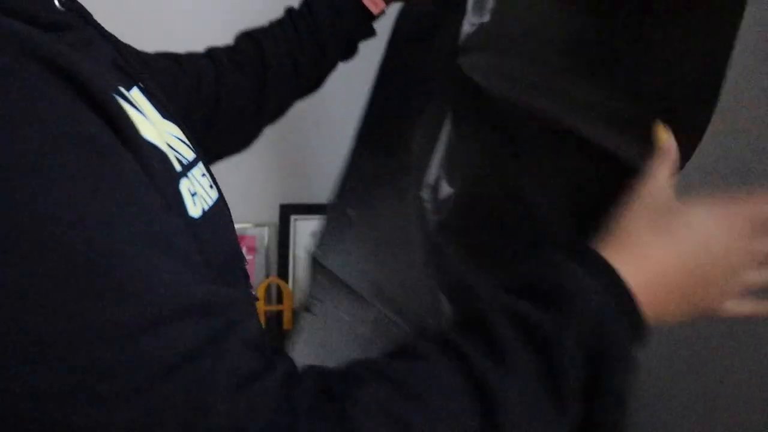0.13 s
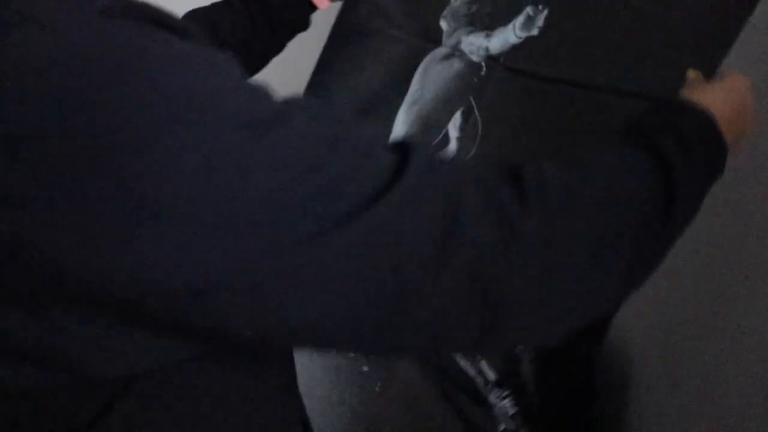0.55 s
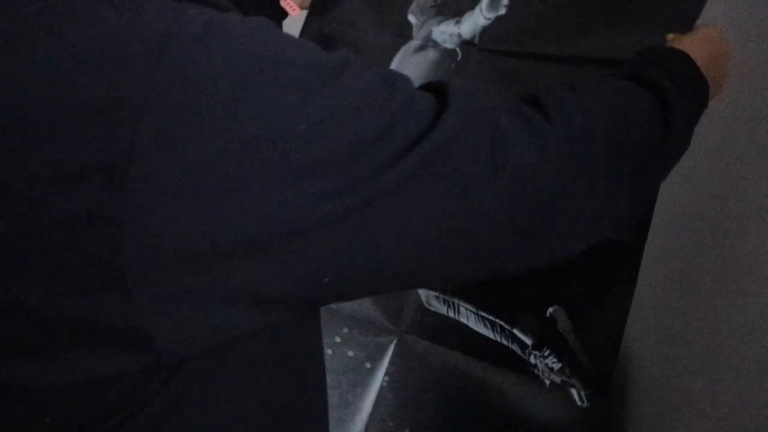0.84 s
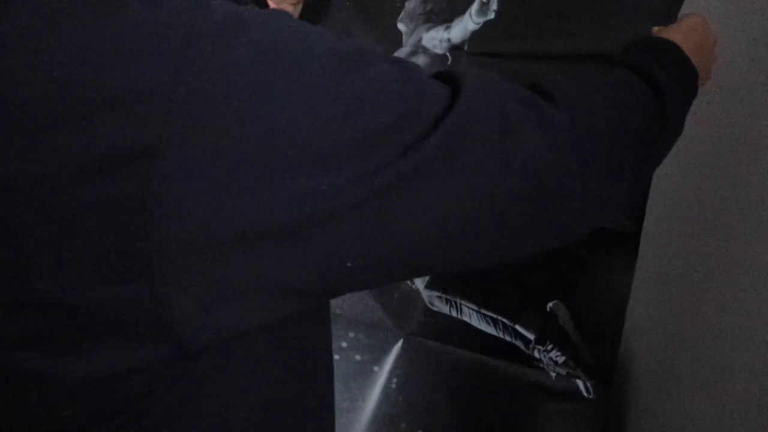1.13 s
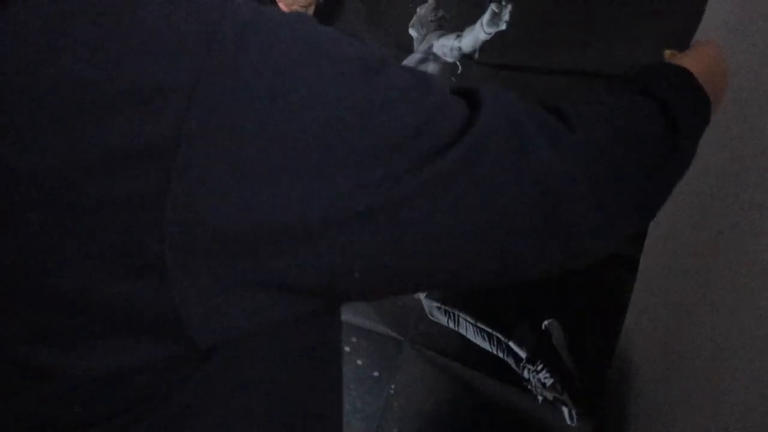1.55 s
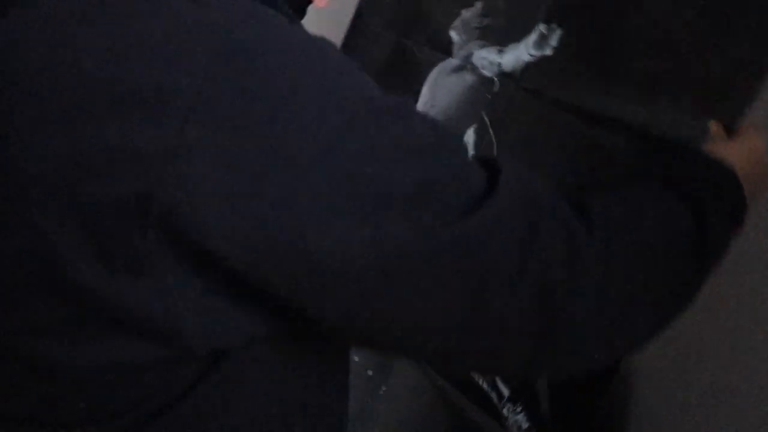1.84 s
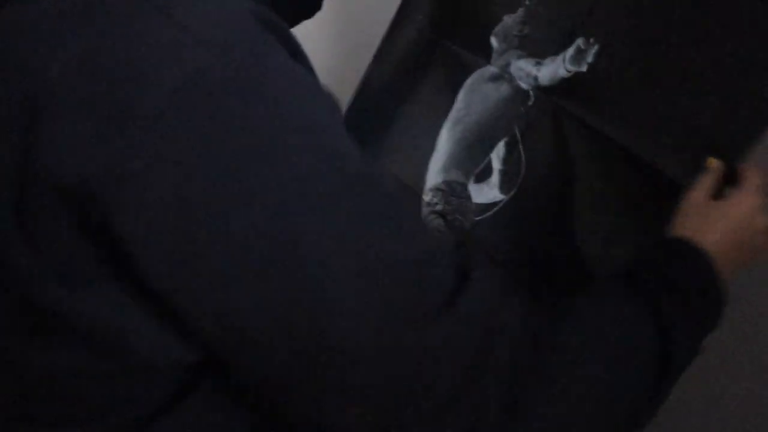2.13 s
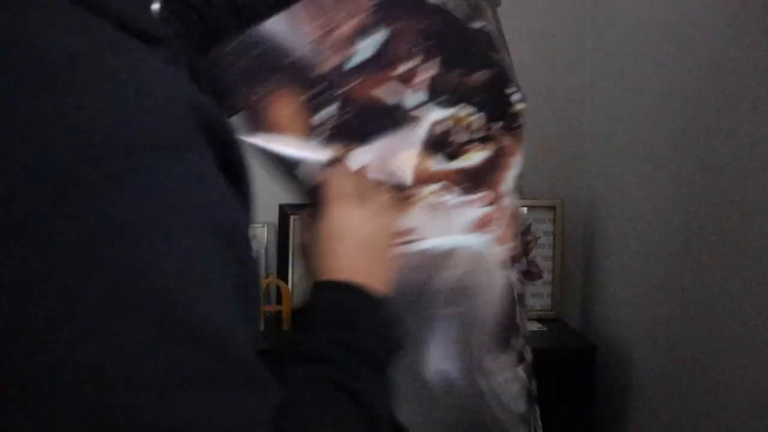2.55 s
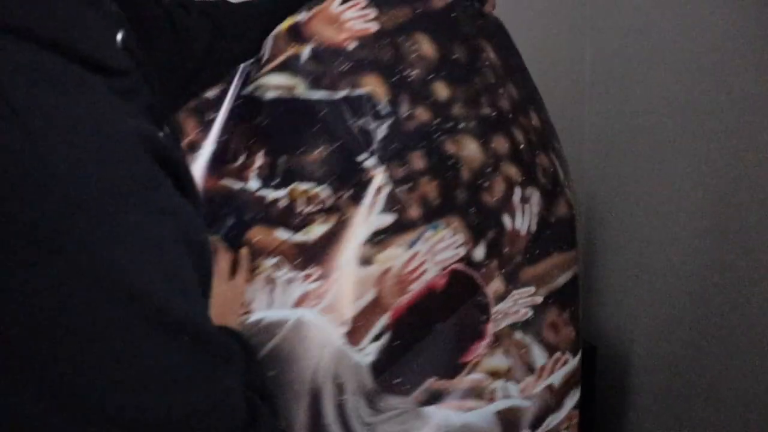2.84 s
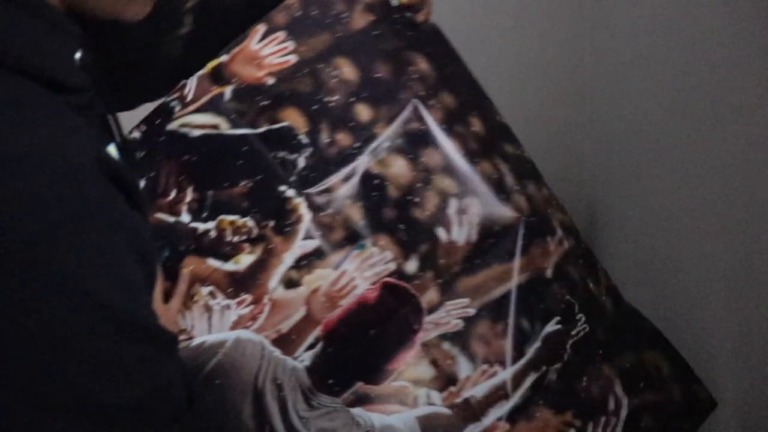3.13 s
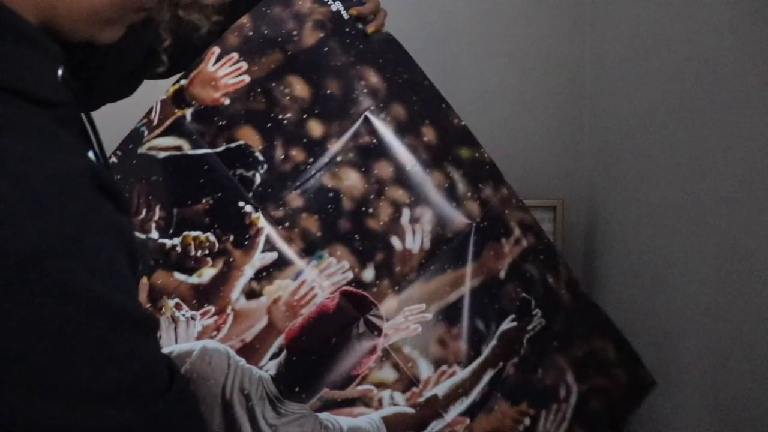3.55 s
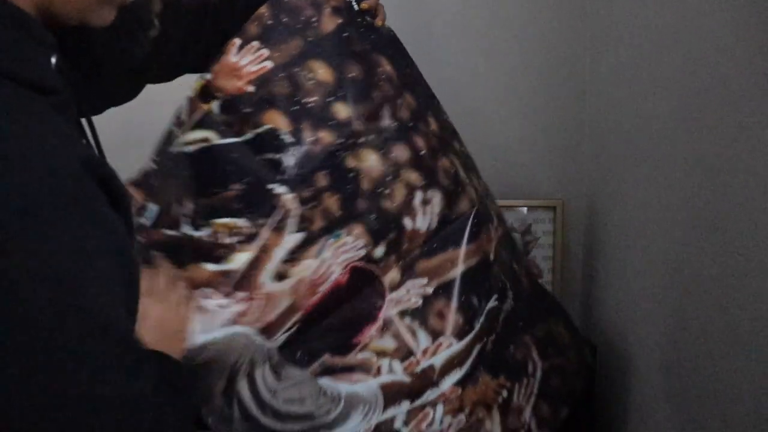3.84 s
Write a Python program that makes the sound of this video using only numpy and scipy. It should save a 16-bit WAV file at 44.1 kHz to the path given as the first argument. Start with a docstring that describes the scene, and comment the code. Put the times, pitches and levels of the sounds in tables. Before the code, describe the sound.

Big sheet of glossy paper handled close to the microphone in a small quiet room; a brief buckling bout, a second of soft room tone, then rubbing, sharp snaps, swelling sizzly shaking with low air gusts, and another stir.

```python
"""A large folded poster of stiff glossy paper is opened and shaken out in a small room, in two bouts.
First bout: random pops and noise, each with its own colour, make the panels buckle, flap and slide with a hiss;
filtered cracks with a flutter are creases snapping through, and the first fold slips open.
In the pause a few faint snaps sound over soft room tone. Second bout: the taut sheet is rubbed and rings,
then the shaking swells with bright sizzle and low gusts; a lull, and it stirs again. The walls ring briefly."""
import sys
import numpy as np
from scipy import signal
from scipy.fft import rfft, irfft, next_fast_len
from scipy.io import wavfile
from scipy.ndimage import uniform_filter1d, minimum_filter1d, map_coordinates

SR = 44100
rng = np.random.default_rng(int(sys.argv[2]) if len(sys.argv) > 2 else 0)


def wav_record(signal):
    """Record a signal, one row per channel, as 16-bit PCM in the file named by sys.argv[1]."""
    frames = np.transpose(np.atleast_2d(signal))
    bounded = np.clip(frames, -1, 1)
    # unit amplitude maps onto the largest positive 16-bit level
    quanta = np.round(bounded * 32767).astype(np.int16)
    wavfile.write(sys.argv[1], SR, quanta)


N = 176400
T = np.arange(N) / SR

# Level curves, one list per stretch of movement; rustle() trims the first four layers.
# how hard the panels buckle [t/s, level/dB before trim]
BUCKLE_LEVEL = [
    [(0, -18.5), (.04, -25), (.065, -22), (.1, -33), (.115, -18.5), (.15, -21), (.175, -22), (.215, -23),
     (.25, -30), (.28, -45)],
    [(.376, -20.5), (.405, -21), (.43, -19.5), (.46, -19.5), (.51, -18), (.545, -21.5), (.59, -18),
     (.675, -23.5), (.71, -33), (.74, -66), (.88, -63)],
    [(1.77, -57), (1.85, -51), (1.865, -27.5), (1.9, -29.5), (1.935, -39), (1.975, -37.5), (2.05, -46.5),
     (2.1, -48.5), (2.17, -44), (2.23, -47), (2.28, -44), (2.35, -36.5), (2.385, -25.5), (2.43, -27),
     (2.47, -32), (2.57, -25.5), (2.64, -27), (2.68, -29), (2.715, -32), (2.75, -31), (2.805, -19.5),
     (2.9, -28.5), (3.05, -31), (3.15, -32.5), (3.255, -28.5), (3.3, -38), (3.38, -52), (3.4, -35),
     (3.425, -35.5), (3.455, -26.5), (3.5, -56.5)],
    [(3.82, -57), (3.89, -50), (3.905, -28), (3.94, -26.5), (4, -38.5)],
]
# how fast paper slides over paper [t/s, level/dB before trim]
SLIDE_LEVEL = [
    [(0, -31.5), (.07, -37.5), (.11, -42.5), (.2, -46)],
    [(.378, -23), (.4, -39.5), (.44, -53), (.465, -28), (.53, -29.5), (.58, -29.5), (.64, -34), (.69, -66)],
    [(1.7, -69), (1.765, -55.5), (1.78, -45.5), (1.83, -45.5), (1.9, -39), (1.945, -41.5), (1.99, -33.5),
     (2.06, -33), (2.105, -53), (2.118, -35.5), (2.18, -43.5), (2.23, -37), (2.34, -39.5), (2.385, -25.5),
     (2.46, -31), (2.52, -29), (2.58, -30), (2.62, -23), (2.69, -33.5), (2.76, -35), (2.8, -21),
     (2.85, -23), (2.95, -22.5), (3.05, -26), (3.12, -33), (3.2, -32.5), (3.26, -44.5), (3.29, -61.5),
     (3.45, -53.5), (3.55, -52)],
    [(3.76, -64.5), (3.8, -45.5), (3.83, -52), (3.865, -37), (3.9, -33.5), (3.95, -28), (4, -30)],
]
# how widely the whole sheet flaps [t/s, level/dB before trim]
FLAP_LEVEL = [
    [(0, -31.5), (.09, -36), (.15, -28.5), (.19, -31.5), (.24, -37.5), (.3, -46.5)],
    [(.378, -25.5), (.42, -34), (.47, -22.5), (.52, -41), (.56, -35), (.61, -37.5), (.645, -26.5),
     (.675, -27.5), (.72, -57), (.85, -66), (1.3, -60)],
    [(1.77, -56.5), (1.845, -53.5), (1.86, -36), (1.93, -51.5), (2.1, -54.5), (2.28, -46.5), (2.39, -49.5),
     (2.44, -34), (2.48, -46), (2.57, -24.5), (2.62, -22.5), (2.67, -27.5), (2.76, -44.5), (2.815, -23),
     (2.87, -30), (2.96, -39), (3.035, -21.5), (3.09, -34.5), (3.135, -25), (3.21, -40), (3.245, -29.5),
     (3.3, -46), (3.4, -42.5), (3.44, -30), (3.48, -48)],
    [(3.9, -38), (3.95, -42.5), (4, -43)],
]
# the highest sizzle [t/s, level/dB before trim]
SIZZLE_LEVEL = [
    [(1.775, -66), (1.9, -79), (2.03, -64.5), (2.1, -72.5), (2.33, -65), (2.47, -60), (2.495, -42),
     (2.58, -52), (2.61, -33), (2.66, -54), (2.76, -60), (2.805, -24.5), (2.87, -29), (2.92, -42.5),
     (3.05, -41.5), (3.13, -62.5), (3.2, -64.5), (3.3, -72)],
    [(3.82, -67), (3.87, -55), (3.91, -55.5), (3.96, -45.5), (4, -41)],
]
# upper hiss as the first fold slips open [t/s, level/dB]
SLIP_LEVEL = [
    [(.45, -55), (.48, -53), (.52, -32), (.57, -40), (.63, -45.5), (.66, -69)],
]
# the sheet, pulled taut between the hands, is rubbed and rings [t/s, level/dB]
TAUT_LEVEL = [
    [(1.94, -49.5), (1.98, -37), (2.05, -29), (2.09, -55), (2.14, -36), (2.175, -40.5), (2.2, -30.5),
     (2.24, -39.5), (2.3, -42.5), (2.36, -49)],
]

# Single events.
# creases flipping through [t/s, level/dB before trim, low edge f/Hz, high edge f/Hz, time to fall 20 dB/s]
CREASE_SNAPS = [(0.1068, -19.5, 300, 1510, 0.012), (0.1115, -13, 696, 1440, 0.00494),
                (.141, -21, 700, 2610, .02), (0.1485, -21.5, 700, 5940, 0.012),
                (0.1561, -14.5, 600, 2060, 0.016), (0.2301, -31, 3500, 7000, 0.028),
                (0.3723, -24, 500, 6950, .004), (0.3728, -25, 500, 7640, 0.0067),
                (0.3888, -18.5, 900, 2890, 0.0044), (0.402, -17.5, 900, 3380, 0.0085),
                (0.4623, -11.5, 500, 3085, 0.0045), (0.4749, -19.5, 450, 1490, 0.004),
                (0.515, -17, 600, 1636, .008), (0.566, -21, 600, 2510, 0.0064),
                (0.632, -20, 350, 2170, .012), (.669, -19, 300, 1670, .015),
                (0.864, -38, 2500, 5560, 0.099), (1.004, -49, 1520, 4500, 0.022),
                (1.022, -42.5, 1300, 4000, 0.068), (1.066, -35, 3300, 5000, 0.046),
                (1.772, -39, 3500, 6700, .04), (1.8539, -16.5, 417, 2240, 0.032),
                (2.114, -47, 2500, 5500, 0.021), (2.198, -41.5, 1200, 1600, 0.0123),
                (2.238, -29, 400, 1780, 0.013), (2.305, -24, 350, 1090, 0.054),
                (2.425, -25.5, 250, 1100, .02), (2.495, -23.5, 300, 1500, 0.0054),
                (2.557, -14.5, 350, 2610, 0.008), (2.6038, -17.5, 300, 4570, 0.0073),
                (2.609, -19, 350, 4100, .018), (2.704, -25.5, 1170, 8570, .012),
                (2.7081, -16.5, 900, 8900, .012), (2.7173, -8, 900, 2420, .006),
                (2.7202, -10, 1190, 4170, 0.0043), (3.0653, -21.5, 900, 3500, 0.0045),
                (3.1205, -20.5, 500, 1930, 0.0057), (3.122, -16, 162, 1090, 0.0022),
                (3.2551, -24, 1200, 5100, 0.011), (3.324, -38, 1200, 4000, 0.0079),
                (3.3872, -25, 1840, 5460, 0.012), (3.394, -27, 800, 1830, 0.0033),
                (3.424, -25, 403, 1210, 0.013), (3.452, -39, 1300, 2440, 0.0095),
                (3.8948, -13, 1250, 2080, 0.018)]
# air pushed by the swinging sheet [crest t/s, level/dB, half length (bell sigma)/s]
AIR_PUFFS = [(.16, -54, 0.052), (.38, -58, 0.024), (1.86, -55, .015), (1.15, -64, 0.086),
             (2.15, -63, 0.083), (2.61, -61, 0.037), (2.84, -45, 0.031), (3.05, -42.5, 0.028),
             (3.125, -53.5, 0.011), (3.335, -46.5, 0.026)]
# a paper edge skims past [crest t/s, level/dB before trim, half length (bell sigma)/s]
EDGE_SKIMS = [(.117, -49, .005), (.148, -39, .009), (.248, -43.5, .012), (.3755, -37, .003),
              (2.348, -52.5, .004), (2.711, -41.5, .003)]

# Colours: only the shape counts, each filtered layer is scaled to rms 1.
# dense pops of the buckling panels [f/Hz, relative level/dB]
BUCKLE_COLOUR = [(20, -71), (80, -46.5), (250, -18.5), (500, -8.5), (800, 4), (1300, 1), (2000, -1.5),
                 (2800, -9.5), (4000, -23.5), (8000, -51), (15000, -74)]
# hiss of sliding paper [f/Hz, relative level/dB]
SLIDE_COLOUR = [(300, -26), (1200, -9.5), (2400, -2), (3500, -2.5), (5200, 0), (6500, -7), (8000, -18.5),
                (11000, -36.5), (15000, -57)]
# low body of the flapping sheet [f/Hz, relative level/dB]
FLAP_COLOUR = [(30, -45.5), (80, -30.5), (150, -16), (240, -8.5), (330, -1.5), (480, -3.5), (700, -14),
               (1500, -31), (5000, -58)]
# top sizzle and skimming edges [f/Hz, relative level/dB]
SIZZLE_COLOUR = [(2000, -48.5), (6000, -3.5), (8000, 3), (10500, 3), (13000, -4), (15500, -20)]
# first fold slipping open [f/Hz, relative level/dB]
SLIP_COLOUR = [(3000, -29), (5500, -6.5), (7400, 4), (8600, -12), (9700, -9.5), (11000, -18.5),
               (13000, -20.5), (15500, -34.5)]
# resonances of the taut sheet [f/Hz, relative level/dB]
TAUT_COLOUR = [(600, -44), (1100, -21.5), (1310, -0.5), (1500, -11.5), (1850, -12), (2400, -35.5),
               (3200, -10.5), (4200, -15.5), (8000, -54)]
# low gusts of pushed air [f/Hz, relative level/dB]
PUFF_COLOUR = [(20, -27), (33, -17), (48, -6.5), (75, -5), (130, -6.5), (400, -44), (2000, -90)]
# the still room [f/Hz, relative level/dB]
HUSH_COLOUR = [(20, -41), (35, -32.5), (55, -14.5), (85, -17), (170, -4.5), (260, -9), (350, -6.5),
               (550, -13.5), (1000, -15.5), (4400, -27), (6500, -27.5), (15500, -40)]
# decay of the diffuse tail [f/Hz, time to fall 60 dB/s]
ROOM_DECAY = [(150, .75), (400, 0.94), (1000, 0.65), (3000, 0.69), (6000, 0.92), (12000, 0.89)]

HUSH_DB, HUM_HZ, HUM_DB = -58.5, 56, -71.5  # noise rms; centres of the hum's wavering pitch and peak level
ROOM_DB, WALL_DB = -11.5, -12  # energy of tail and of wall echoes, against the direct sound
SNAP_TAIL_DB = -1  # flutter against crack, for a fall time of 2.7 ms
PATCHY_DB = 3  # rms depth of the drifting colour of the rustle
TOP_HZ = 15750  # band limit


def amp(db):
    """Decibels to gain."""
    return 10 ** (np.asarray(db) / 20)


def unit(x):
    """Scale to rms 1."""
    return x / np.sqrt(np.mean(x ** 2) + 1e-20)


def along(points, hz):
    """Read (Hz, value) points on a log frequency axis."""
    f, v = np.transpose(points)
    return np.interp(np.log(hz + 1), np.log(f + 1), v)


def gesture(parts, fade_s):
    """Gain from level curves; outside each one it falls 20 dB per fade_s."""
    level = np.full(N, -120.)
    for rows in parts:
        s, db = np.transpose(rows)
        outside = np.maximum(s[0] - T, 0) + np.maximum(T - s[-1], 0)
        level = np.maximum(level, np.interp(T, s, db) - 20 * outside / fade_s)
    return amp(level)


def swells(rows):
    """Gain of short bell-shaped swells."""
    return sum(amp(db) * np.exp(-.5 * ((T - s) / half) ** 2) for s, db, half in rows)


def wobble(rate):
    """A smooth random curve, rate knots a second."""
    return map_coordinates(rng.standard_normal(4096), [T * rate], mode="wrap")


def coloured(x, colour):
    """Causal minimum-phase filter with the given spectrum, scaled to rms 1."""
    m = next_fast_len(N + SR // 2)
    hz = np.fft.rfftfreq(m, 1 / SR)
    cepstrum = irfft(np.log(amp(along(colour, hz))), m)
    # folding the cepstrum forward in time keeps any ringing after each pop
    cepstrum[1:m // 2] *= 2
    cepstrum[m // 2 + 1:] = 0
    response = np.exp(rfft(cepstrum, m))
    return unit(irfft(rfft(x, m) * response, m)[:N])


def crinkle(rate, scatter_db, smooth_db):
    """Random tiny pops (rate/s) of uneven size over a smooth rub; their colour drifts as the sheet bends."""
    sizes = amp(scatter_db * np.clip(rng.standard_normal(N), -2, 2)) * rng.choice([-1, 1], N)
    pops = unit(sizes * (rng.random(N) < rate / SR))
    grain = pops + amp(smooth_db) * rng.standard_normal(N)
    # even out the loudness, so that the gestures alone shape it
    grain = grain / np.sqrt(np.abs(uniform_filter1d(grain ** 2, size=1300)) + 1e-9)
    z = signal.stft(grain, nperseg=512)[2]
    # random patches, smoothed over frequency and then over time
    patches = uniform_filter1d(rng.standard_normal(z.shape), size=3, axis=0)
    patches = uniform_filter1d(patches, size=12, axis=1)
    return signal.istft(z * amp(PATCHY_DB * unit(patches)), nperseg=512)[1][:N]


def hush():
    """Room tone as coloured noise, with a faint hum wavering in pitch and level."""
    hum_tone = np.sin(2 * np.pi * HUM_HZ * T + 1.1 * wobble(3.2))
    hum = hum_tone * amp(HUM_DB + 2.5 * wobble(5.9))
    return amp(HUSH_DB) * coloured(rng.standard_normal(N), HUSH_COLOUR) + hum


def room(x):
    """Near walls answer after 2 to 22 ms, while a diffuse tail builds up and dies away by frequency."""
    hz, t, z = signal.stft(rng.standard_normal(SR), SR, nperseg=256)
    decay = amp(-60 * t / along(ROOM_DECAY, hz)[:, None])
    tail = signal.istft(z * decay, SR, nperseg=256)[1][:SR]
    lag = np.arange(SR) / SR
    tail *= 1 - np.exp(-lag / 0.0032)  # soft onset
    echo_at = (SR * rng.uniform(.002, .022, size=12)).astype(int)
    walls = np.bincount(echo_at, rng.choice([-1., 1.], size=12), SR)
    answer = amp(ROOM_DB) * tail / np.linalg.norm(tail)
    answer = answer + amp(WALL_DB) * walls / np.linalg.norm(walls)
    return x + signal.fftconvolve(x, answer)[:N]


def puffs():
    """Low gusts from the swinging sheet: bell-shaped swells of dull noise."""
    return swells(AIR_PUFFS) * coloured(rng.standard_normal(N), PUFF_COLOUR)


def rubbing():
    """The first fold slipping open, and the taut sheet ringing under the fingers."""
    slip = coloured(crinkle(rate=2000, scatter_db=9.5, smooth_db=0.5), SLIP_COLOUR)
    taut = coloured(crinkle(rate=610, scatter_db=2, smooth_db=-17.5), TAUT_COLOUR)
    return slip * gesture(SLIP_LEVEL, fade_s=.03) + taut * gesture(TAUT_LEVEL, fade_s=.04)


def snaps():
    """Each crease gives one crack and a short flutter; bigger panels sound lower."""
    out, t = np.zeros(N + SR), np.arange(SR // 10) / SR
    for s, db, low_hz, high_hz, fall_s in CREASE_SNAPS:
        low_cut = signal.butter(2, np.clip(low_hz, 30, 8000), "high", fs=SR, output="sos")
        high_cut = signal.butter(6, np.clip(high_hz, 300, 18000), fs=SR, output="sos")
        crack = signal.sosfilt(high_cut, 1. * (t == 0))
        flutter = signal.sosfilt(high_cut, rng.standard_normal(len(t)) * amp(-20 * t / fall_s))
        # a longer flutter carries more energy
        flutter_gain = amp(SNAP_TAIL_DB) * np.sqrt(fall_s / 0.0027)
        hit = signal.sosfilt(low_cut, unit(crack) + flutter_gain * unit(flutter))
        out[round(s * SR):][:len(t)] += amp(db - 11.5) * unit(hit)
    return out[:N]


def rustle():
    """The moving sheet: buckling pops, sliding hiss, flapping body and top sizzle, each trimmed in level."""
    buckle = coloured(crinkle(rate=700, scatter_db=2, smooth_db=-1.5), BUCKLE_COLOUR)
    slide = coloured(crinkle(rate=3000, scatter_db=4.5, smooth_db=0), SLIDE_COLOUR)
    flap = coloured(crinkle(rate=200, scatter_db=4, smooth_db=-6), FLAP_COLOUR)
    sizzle = coloured(crinkle(rate=3200, scatter_db=6, smooth_db=-5.5), SIZZLE_COLOUR)
    sizzle_gain = gesture(SIZZLE_LEVEL, fade_s=.03) + swells(EDGE_SKIMS)
    return (amp(-0.96) * buckle * gesture(BUCKLE_LEVEL, fade_s=0.0069)
            + amp(0.28) * slide * gesture(SLIDE_LEVEL, fade_s=0.0081)
            + amp(0.33) * flap * gesture(FLAP_LEVEL, fade_s=0.0067)
            + amp(1.1) * sizzle * sizzle_gain)


def scene():
    """The paper rings in the room; gusts and room tone join it without echo."""
    paper = rubbing() + snaps() + rustle()
    return (room(paper) + puffs() + hush())[None]


def record(dry):
    """The recorder ducks the highest peaks for a moment and keeps nothing above its band limit."""
    needed = 1 / np.maximum(np.abs(dry), 1)
    gain = uniform_filter1d(minimum_filter1d(needed, size=17), size=17)
    m = next_fast_len(N + SR // 2)
    in_band = np.fft.rfftfreq(m, 1 / SR) < TOP_HZ
    return irfft(rfft(dry * gain, m) * in_band, m)[..., :N]


dry = scene()
out = record(dry)
wav_record(out)
```